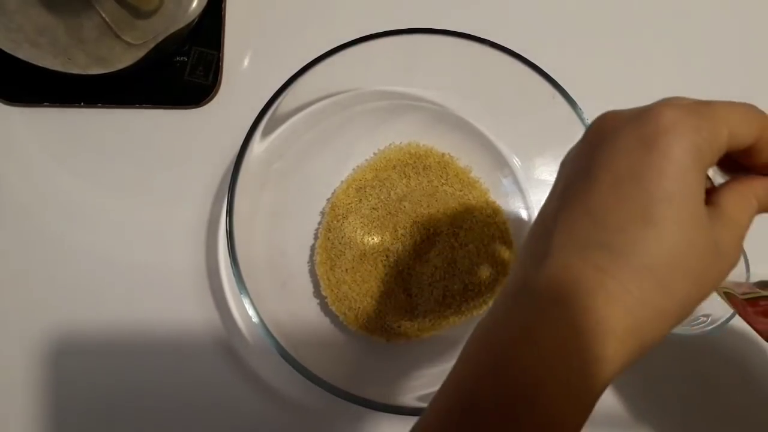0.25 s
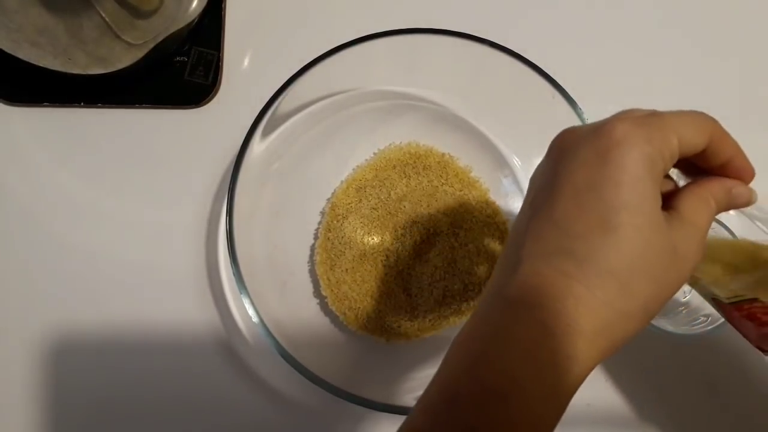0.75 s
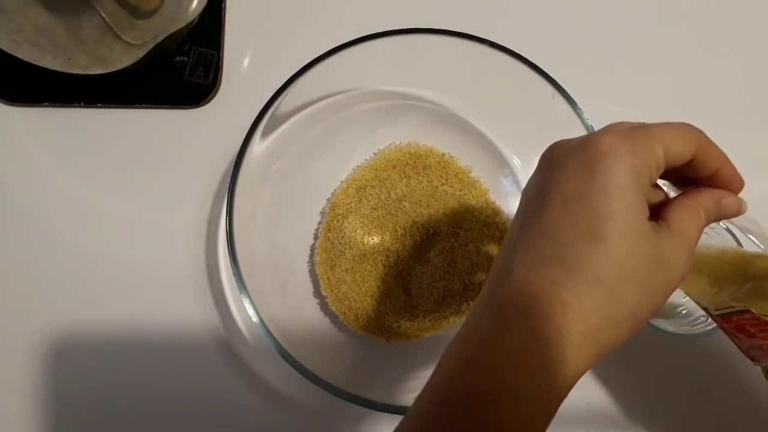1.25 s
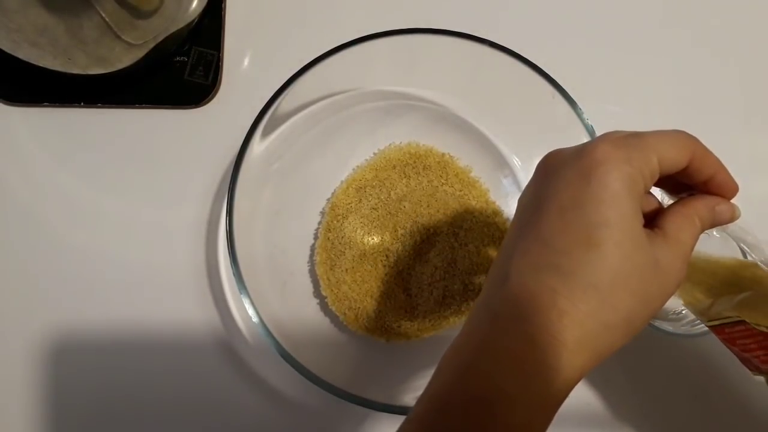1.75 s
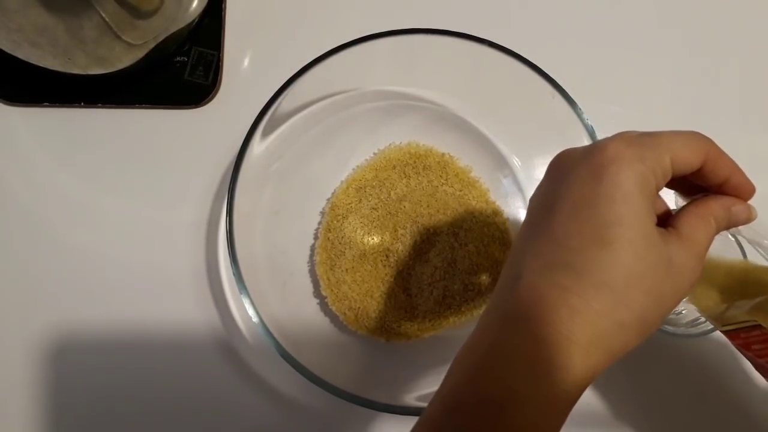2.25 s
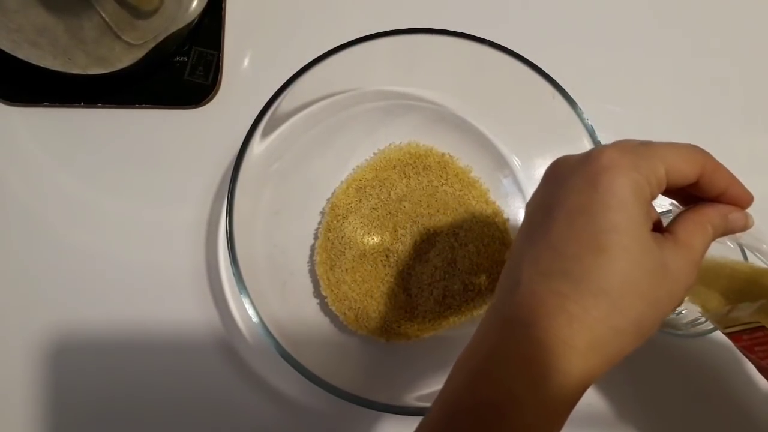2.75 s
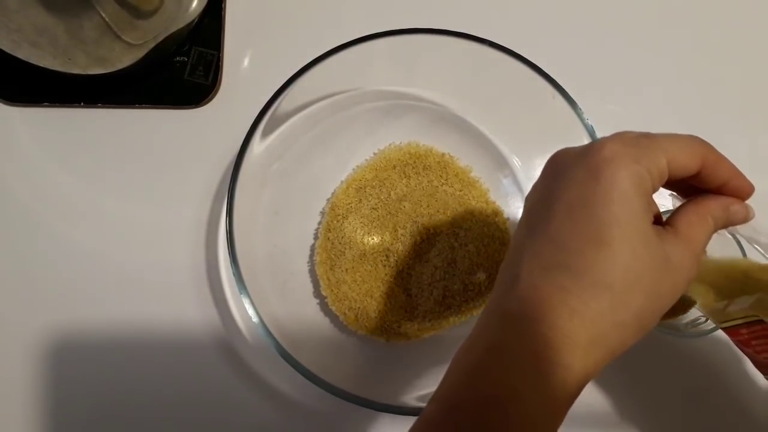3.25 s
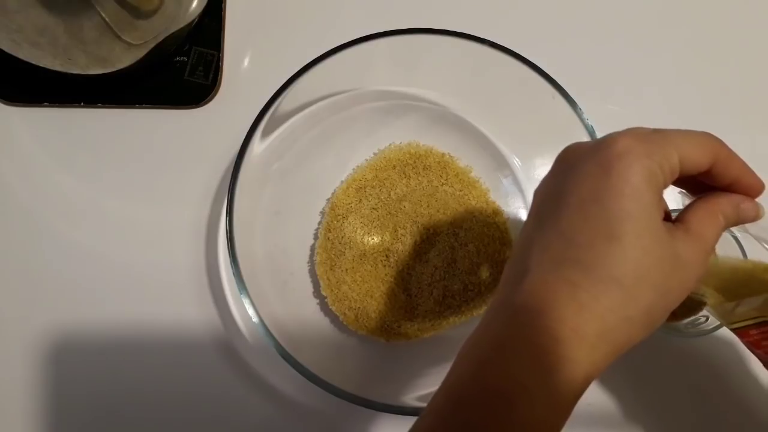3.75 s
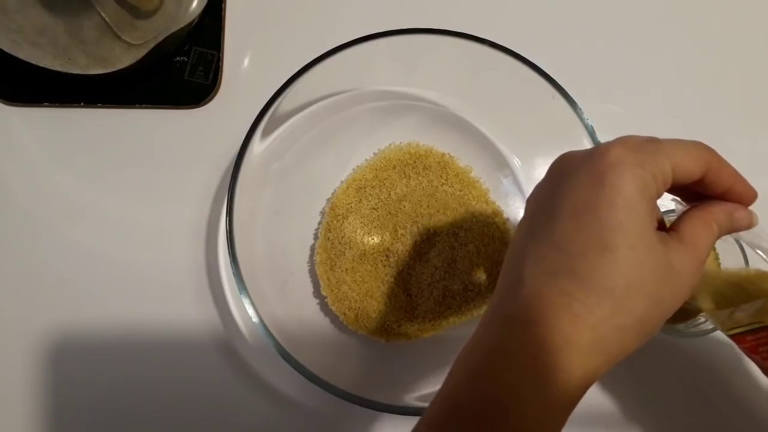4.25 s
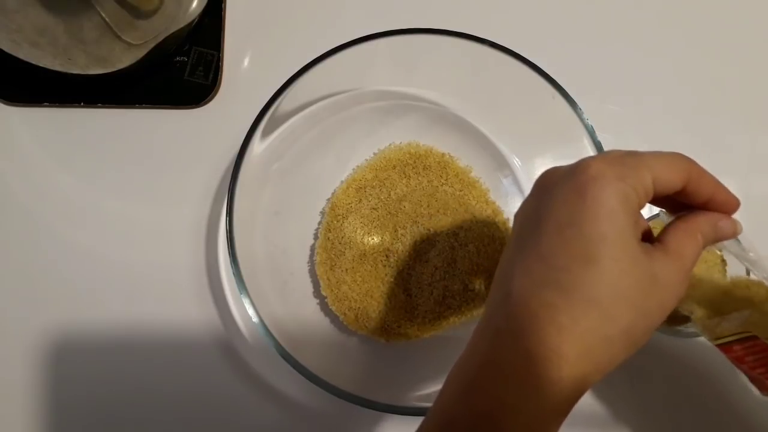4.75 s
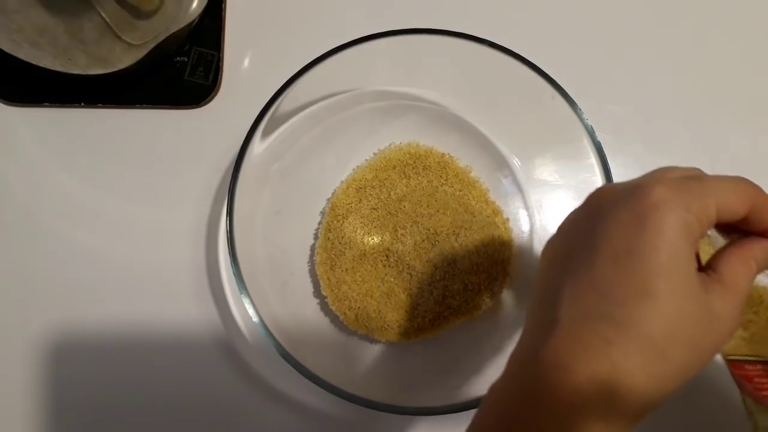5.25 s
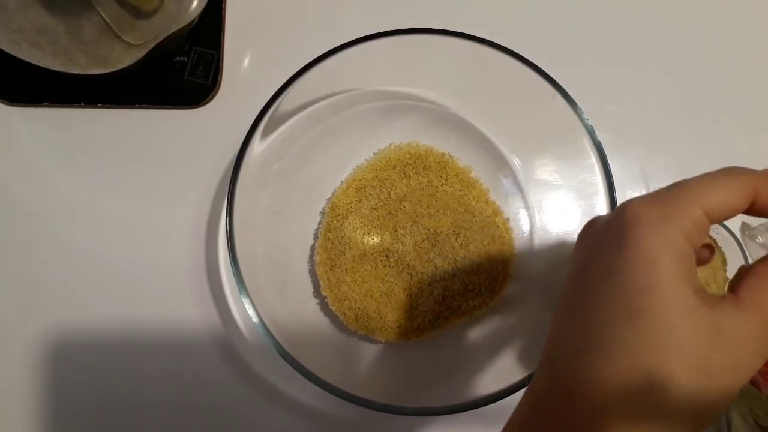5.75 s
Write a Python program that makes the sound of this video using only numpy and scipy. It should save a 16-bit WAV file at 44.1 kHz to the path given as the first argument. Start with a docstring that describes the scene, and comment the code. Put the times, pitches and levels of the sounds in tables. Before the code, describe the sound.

Stiff plastic film snaps sharply as grain rushes into a drinking glass, then the trickle fades with scattered clicks and a final light rustle.

```python
"""Fine bulgur runs from a plastic package into a drinking glass on a kitchen counter.
An appliance hums in the small room throughout. The stiff film snaps, most densely at first, and the stream
hisses and patters. Falling grain rings the glass until it covers the bottom, and one snap sets off a low
hollow ring of the room near 900 Hz. The stream thins out while the package ticks, snaps and shifts; the film
finally rustles as it is lifted. Grain is filtered random impacts, snaps are kicked resonances."""
import sys
import numpy as np
from scipy import signal
from scipy.fft import rfft, irfft, next_fast_len
from scipy.io import wavfile

SR = 44100
rng = np.random.default_rng(int(sys.argv[2]) if len(sys.argv) > 2 else 0)


def dump_mix(stems):
    """Bounce the given channels to the path in sys.argv[1] as a 16-bit WAV at rate SR."""
    frames = np.atleast_2d(stems).T  # one column per channel
    limited = np.clip(frames, -1, 1)  # hard clip at full scale
    pcm = np.round(limited * 32767).astype(np.int16)
    wavfile.write(sys.argv[1], SR, pcm)


N = 264600

# buckles of the film: start_s, strength_db, panel pitch_hz, body_db, sharp edge_db
# (body and edge are relative to the strength)
SNAPS = [ (0.035, -11, 970, 1.5, -18), (0.1305, 7.5, 1970, -12, -13.5), (0.2153, -13, 1850, -17, -19),
         (0.2878, 1, 1250, -3, -5.5), (0.3906, -6.5, 780, -8, -21), (.4724, -8, 1100, -4, -18),
         (0.5008, 4.5, 2170, -13, -6), (0.5873, -4, 1710, -2, -4.5), (0.598, -1, 910, -6, -9.5),
         (0.6315, -15, 1080, 19, -7), (.6448, -1.5, 1060, 5.5, -27), (.6479, 3, 860, -16, -6),
         (.656, -3, 810, -8, -28), (0.7122, -1.5, 1050, 2.5, -1), (0.7959, -6, 1310, 1, -12),
         (1.1024, -11, 1320, -5, -13), (1.1087, -2, 1060, 9.5, -6.5), (1.1972, -13, 950, 4.5, -23),
         (1.4316, -21, 1050, 0, -16), (1.474, 1.5, 1170, -1.5, -5), (1.6098, -6, 920, 8, -12),
         (1.755, -5, 1200, 8, 1), (1.873, -11.5, 910, 10, -7), (2.0362, -11.5, 1190, 6, -4),
         (2.1144, -13.5, 1080, 10.5, 1), (2.345, -24.5, 1200, 9, -10), (2.8395, -28, 910, 13.5, -4),
         (3.0324, -11, 970, 7.5, -18), (3.5683, -5.5, 1760, 1, -19), (4.133, -20.5, 1410, 4, -9),
         (4.4886, -7.5, 1060, -2, -30), (4.968, -15.5, 930, 6, -31), (5.183, -13, 1430, -9, -0.5),
         (5.3103, -29.5, 1440, 20, -24), (5.4416, -14, 2460, -32, -7.5), (5.5014, -23, 1070, 5, -12),
         (5.6871, -14, 1900, -19, -10.5), (5.8477, -23, 1000, 5, -6), (5.8835, -18.5, 1040, 8.5, -6.5),
         (5.9843, -23, 950, 11, -6.5)]
# spectrum of the room air: freq_hz, density_db (per Hz, relative)
AIR_SPECTRUM = [(20, -3), (35, -35), (50, -4.5), (62, -12), (105, -6.5), (150, -0.5), (200, -3.5),
                (300, -6.5), (450, 0), (650, -8.5), (1000, -11.5), (2000, -16), (6000, -33), (12000, -21.5),
                (16000, -13.5)]


def amp(db):
    """Decibels to gain."""
    return 10 ** (np.asarray(db) / 20)


def unit(x):
    """Scale to rms 1."""
    return x / np.sqrt(np.mean(x ** 2) + 1e-20)


def along(points, hz):
    """Read (Hz, value) points on a log frequency axis."""
    f, v = np.transpose(points)
    return np.interp(np.log(hz + 1), np.log(f), v)


def curves(rows):
    """One value per sample for each column after the time."""
    s, *cols = np.transpose(rows)
    return [np.interp(np.arange(N) / SR, s, c) for c in cols]


def wobble(rate):
    """A smooth random curve, rate knots a second."""
    knots = rng.standard_normal(int(N * rate / SR) + 4)
    smooth = signal.resample(knots, 10 * len(knots))
    return np.interp(np.arange(N) * 10 * rate / SR, np.arange(len(smooth)), smooth)


def filtered(x, response):
    """Apply a complex response of frequency to x."""
    m = next_fast_len(len(x) + min(len(x), SR // 10), True)
    spectrum = rfft(x, m) * response(np.fft.rfftfreq(m, 1 / SR))
    return irfft(spectrum, m)[:len(x)]


def coloured(x, spectrum):
    """Filter x by a spectrum in dB and scale it to rms 1."""
    return unit(filtered(x, lambda f: amp(along(spectrum, f))))


def resonance(f, hz, q):
    """A causal resonance with gain 1 at its centre."""
    damping = 1j * f * hz / q
    return damping / (hz * hz - f * f + damping)


def add(track, s, sound):
    """Mix a sound into the track at time s."""
    start = int(np.clip(round(s * SR), 0, N - 1))
    track[start:start + len(sound)] += sound[:N - start]


def impacts(rate, spread_db):
    """Tiny random impacts of uneven size and random sign, rate a second."""
    size = amp(spread_db * np.clip(rng.standard_normal(N), -2, 2))
    return (rng.random(N) < rate / SR) * size * rng.choice([-1, 1], N)


def swells(rows, attack_s, release_s):
    """Gain of gestures that rise ahead of their start, hold for their length and die away exponentially."""
    t = np.arange(N) / SR
    gain = 0
    for s, length, db in rows:
        before = np.maximum(s - t, 0)
        after = np.maximum(t - s - length, 0)
        gain = gain + amp(db) * np.exp(-before / attack_s - after / release_s)
    return gain


def background():
    """Room air is coloured noise; an appliance hums in tones of unsteady level and phase."""
    # tones of the appliance: pitch_hz, level_db (rms, about which it wavers)
    hum_tones = [(147.5, -76), (172, -78), (246.8, -67), (296, -75)]
    t = np.arange(N) / SR
    hum = np.zeros(N)
    for hz, db in hum_tones:
        level = amp(db + 1.33 * wobble(4.09)) * np.sqrt(2)
        hum += level * np.sin(2 * np.pi * hz * t + 0.57 * wobble(3.5))
    return hum + amp(-66) * coloured(rng.standard_normal(N), AIR_SPECTRUM)


def kitchen(x, tail_db=-12, early_db=-16, early_t60=0.078):
    """The counter and near walls scatter the sound, then the room lets it die away."""
    # reverberation time of the room: freq_hz, t60_s
    room_decay = [(150, 0.66), (1000, 0.68), (4000, 0.48), (9000, 0.45), (16000, 0.35)]
    hz, t, z = signal.stft(rng.standard_normal(SR // 2), SR, nperseg=256)
    decay = amp(-60 * t / along(room_decay, hz)[:, None])
    tail = signal.istft(z * decay, SR, nperseg=256)[1]
    t = np.arange(len(tail)) / SR
    tail = tail * (1 - np.exp(-t / 0.0088))  # builds up over some ms
    # cubed noise is sparse, like a few distinct reflections
    early = rng.standard_normal(len(t)) ** 3 * amp(-60 * t / early_t60) * (1 - np.exp(-t / 0.009))
    echo = amp(tail_db) * tail / np.linalg.norm(tail) + amp(early_db) * early / np.linalg.norm(early)
    return signal.fftconvolve(x, echo)


def room_ring():
    """A snap sets off a low hollow ring of the room near 900 Hz: a sum of decaying sines."""
    # low rings set off by a snap: start_s, level_db
    rings = [(1.1092, -50)]
    # modes of the room: pitch_hz, level_db (relative to the ring), t60_s
    room_modes = [(828, -7, 0.64), (910, -1, 0.57), (930, 1.5, .55), (980, -20, 0.24)]
    out = np.zeros(N)
    t = np.arange(SR // 2) / SR
    for s, db in rings:
        ring = sum(amp(db + level - 60 * t / t60) * np.sin(2 * np.pi * hz * t)
                   for hz, level, t60 in room_modes)
        add(out, s, ring)
    return out


def shifts():
    """The package drags a little and the counter rumbles faintly, as swells of low noise."""
    # muffled drags: start_s, length_s, level_db
    drags = [(2.75, .11, -67), (4.27, 0.17, -63.5), (5.8, .2, -70)]
    # spectrum of the counter: freq_hz, density_db (per Hz, relative)
    counter_spectrum = [(30, -18), (55, -21), (78, 4), (110, -12), (170, 4.5), (400, -2), (1500, -58)]
    rumble = coloured(rng.standard_normal(N), counter_spectrum)
    return swells(drags, attack_s=0.03, release_s=0.035) * rumble


def glass():
    """Falling grains keep the resonances of the glass ringing until the heap damps it."""
    # grain striking the bare glass, a level curve: time_s, level_db
    strike_curve = [(.55, -85), (.82, -56), (1.0, -58.5), (1.3, -63.5), (1.55, -68), (2.0, -100)]
    # resonances of the glass: pitch_hz, width_hz, level_db (relative)
    glass_modes = [(2640, 90, -13), (4400, 37, -18), (5300, 40, -13), (6200, 14, 4), (8880, 73, -1),
                   (10600, 170, -9), (11703, 20, 6.5), (12667, 23, -12)]
    wall = lambda f: sum(amp(db) * resonance(f, hz, hz / width) for hz, width, db in glass_modes)
    ringing = unit(filtered(impacts(rate=1300, spread_db=-4), wall))
    return amp(curves(strike_curve)[0]) * ringing


def buckle(hz, body_db, edge_db, jump, scatter, scatter_t60=0.0097, thump_hz=330, edge_hz=9000):
    """One buckle kicks a crease, the panel around it and the air in the package."""
    crease_over_panel = 2.44  # pitch ratio
    thump_db = -6.5  # the air in the package, relative to the panel
    sharp_hz, dulling_oct_per_db = 26000, 0.0926  # a slower buckle has less edge and loses its treble
    t = np.arange(SR // 25) / SR
    # the main jump is followed by a millisecond or two of smaller slips
    slips = rng.standard_normal(len(t)) * amp(-60 * t / scatter_t60) * (1 - np.exp(-t / 0.0009))
    kick = jump * (t == 0) + scatter * slips / np.linalg.norm(slips)
    top_hz = sharp_hz * 2 ** (dulling_oct_per_db * edge_db)

    def film(f):
        """Air thump, panel, crease and sharp edge together, dulled above the top."""
        thump = amp(body_db + thump_db) * resonance(f, thump_hz, q=0.69) ** 2
        panel = amp(body_db) * resonance(f, hz, q=2.04) ** 2
        crease = resonance(f, crease_over_panel * hz, q=1.14) ** 2
        edge = amp(edge_db) * resonance(f, edge_hz, q=0.98)
        return (thump - panel + crease - edge) / np.sqrt(1 + (f / top_hz) ** 4)

    return filtered(kick, film)


def ticks(count=30):
    """The emptying package also ticks faintly at random: slight buckles."""
    strength_db, strength_spread_db = -36, 7
    pitch_hz, pitch_spread_oct = 1000, 0.21
    body_db, edge_db = 7, -2  # relative to the strength
    out = np.zeros(N)
    places = rng.integers(N, size=count)
    variations = np.clip(rng.standard_normal((count, 2)), -2, 2)
    for at, (size, pitch) in zip(places, variations):
        tick_hz = pitch_hz * 2 ** (pitch_spread_oct * pitch)
        tick = buckle(tick_hz, body_db, edge_db, jump=0.65, scatter=0.69)
        add(out, at / SR, amp(strength_db + strength_spread_db * size) * tick)
    return out


def flexes(low_hz=170, extra_hz=3200, glide_s=0.0035, t60=0.076):
    """Bending waves carry their treble fastest, so each arrives as a quick falling chirp."""
    # flexing waves that run through the whole package: start_s, level_db
    waves = [(.529, -35.5), (.599, -31), (0.655, -42.5)]
    out = np.zeros(N)
    t = np.arange(SR // 10) / SR
    phase = 2 * np.pi * np.cumsum(low_hz + extra_hz * np.exp(-t / glide_s)) / SR
    for s, db in waves:
        add(out, s, amp(db - 60 * t / t60) * np.sin(phase))
    return out


def rustle(crease_spread_db=10.0, clump_db=3.0):
    """Small creases give way in clumps while the package is tilted: short bursts of noise."""
    # rustling gestures: start_s, length_s, level_db
    crumples = [(.02, 0.71, -55.5), (.51, 0.11, -41), (.68, 0.072, -49.5), (5.708, 0.022, -54.5),
                (5.805, 0.0054, -50.5), (5.886, 0.0089, -54.5), (5.92, 0.08, -60)]
    # spectrum of the film: freq_hz, density_db (per Hz, relative)
    film_spectrum = [(100, -11), (300, 2), (1000, -2), (3000, -1), (7000, -3), (11000, -6), (16000, -1)]
    creases = impacts(1100, crease_spread_db) * amp(clump_db * wobble(130))
    t = np.arange(SR // 200) / SR
    flutter = rng.standard_normal(len(t)) * amp(-60 * t / 0.0092)  # each crease flutters for an instant
    crackle = coloured(signal.oaconvolve(creases, flutter)[:N], film_spectrum)
    return swells(crumples, attack_s=0.013, release_s=0.028) * crackle


def snaps():
    """The film buckles in a new place each time, so each snap has its own echo."""
    out = np.zeros(N)
    for s, db, hz, body_db, edge_db in SNAPS:
        direct = buckle(hz, body_db, edge_db, jump=0.81, scatter=0.41)
        add(out, s, amp(db) * direct)
        # the walls collect the snap from all directions, which evens out its colour
        outward = buckle(hz, body_db, edge_db, jump=0.89, scatter=0.067)
        add(out, s, amp(db) * kitchen(outward))
    return out


def spurts(rise_s=0.0041):
    """Gain of the grain that each snap shakes loose: a quick rise and a slow settling."""
    level_db, t60 = -56.5, 0.4  # level relative to the panel of the snap, settling time in s
    out = np.zeros(N)
    t = np.arange(SR) / SR
    for s, db, hz, body_db, edge_db in SNAPS:
        settling = amp(level_db + db + body_db - 60 * t / t60)
        add(out, s, settling * (1 - np.exp(-t / rise_s)))
    return out


def stream(hiss_spread_db=5.5, patter_spread_db=3, spurt_hiss_db=-3):
    """Countless grains slide and collide; the film under them patters. Each snap adds a spurt."""
    # level curves of the stream: time_s, hiss_db of sliding grain, patter_db on the film
    flow = [(0.0, -48.5, -55), (0.41, -45.5, -58), (0.64, -44.5, -51), (0.85, -48.5, -56.5),
            (1.26, -58, -75.5), (1.49, -61, -59), (1.68, -56, -59.5), (1.97, -55, -65.5),
            (2.16, -55.5, -64.5), (2.47, -59, -65.5), (2.8, -57.5, -70), (3.15, -62, -65.5),
            (3.51, -59.5, -65.5), (3.7, -62.5, -70.5), (4.77, -62.5, -67), (5.05, -68, -64.5),
            (5.44, -78, -71), (5.65, -70, -66.5)]
    # spectra of both: freq_hz, density_db (per Hz, relative)
    hiss_spectrum = [(100, -38), (400, -20.5), (1500, -5), (2600, -1.5), (5500, -0.5), (7500, -1),
                     (10000, -3.5), (16000, -5)]
    patter_spectrum = [(80, -21), (160, 2.5), (350, 5), (650, -3.5), (1000, -0.5), (1500, -7.5),
                       (2200, -6.5), (5000, -20), (16000, -65)]
    hiss_db, patter_db = curves(flow)
    surge_db = 0.35 * wobble(24.95)
    hiss = coloured(impacts(26000, hiss_spread_db), hiss_spectrum)
    patter = coloured(impacts(4000, patter_spread_db), patter_spectrum)
    loose = spurts()
    # steady flow and spurts add in power
    hiss_gain = np.hypot(amp(hiss_db), amp(spurt_hiss_db) * loose)
    patter_gain = np.hypot(amp(patter_db), loose)
    return amp(surge_db) * (hiss_gain * hiss + patter_gain * patter)


def scene():
    """Everything is heard from one point, with only a faint difference between the sides."""
    pouring = flexes() + rustle() + stream() + ticks()
    echo = kitchen(pouring)[:N]
    mid = pouring + echo + snaps() + room_ring() + glass() + shifts() + background()
    side_air = amp(-78.5) * coloured(rng.standard_normal(N), AIR_SPECTRUM)
    side = side_air + amp(-111.5) * rng.standard_normal(N)
    return np.array([mid + side, mid - side])


def record(dry, port_hz=8720, port_q=14, port_gain=1.44, roll_hz=11400, top_hz=15950):
    """The microphone port resonates in the treble and rolls off above, up to the band limit."""
    def port(f):
        """Resonance and roll-off, with nothing from the band limit up."""
        peak = 1 + port_gain * resonance(f, port_hz, port_q)
        return peak / np.sqrt(1 + (f / roll_hz) ** 4) * (f < top_hz)

    return np.array([filtered(channel, port) for channel in dry])


dry = scene()
out = record(dry)
dump_mix(out)
```